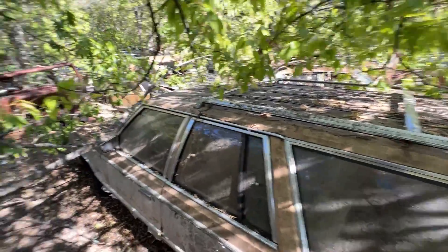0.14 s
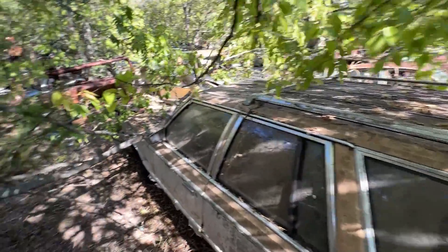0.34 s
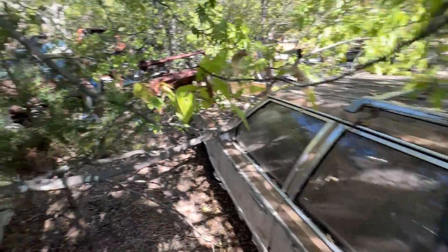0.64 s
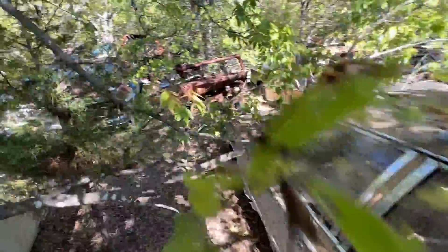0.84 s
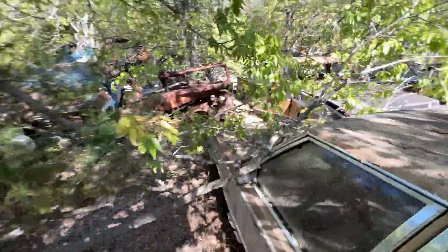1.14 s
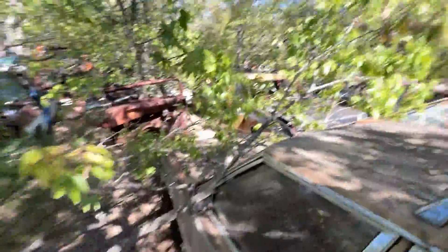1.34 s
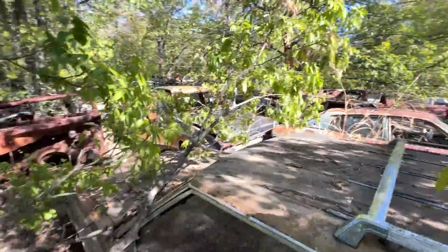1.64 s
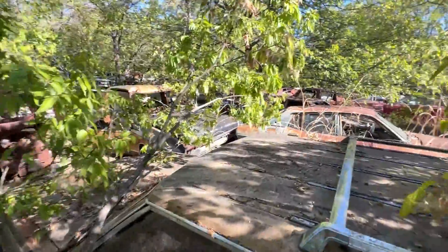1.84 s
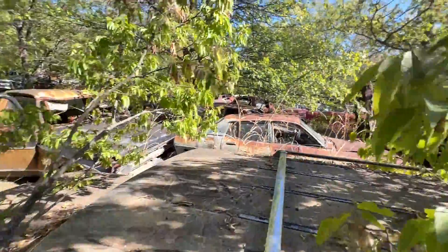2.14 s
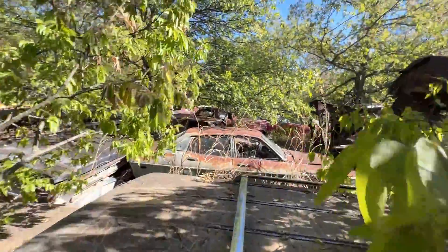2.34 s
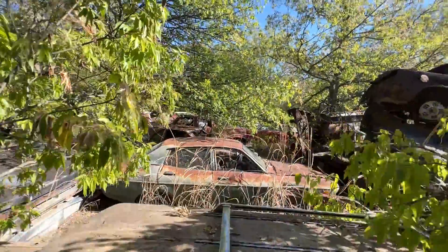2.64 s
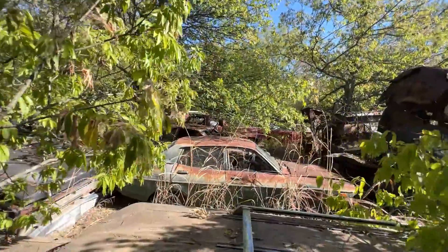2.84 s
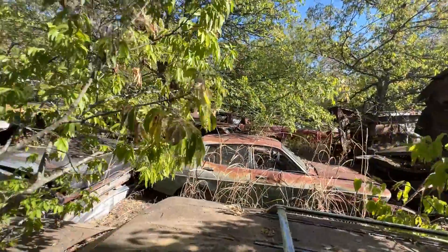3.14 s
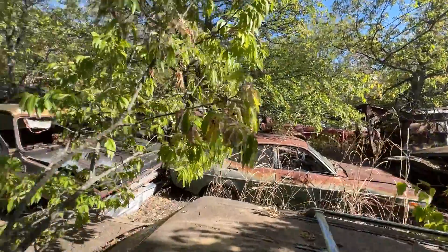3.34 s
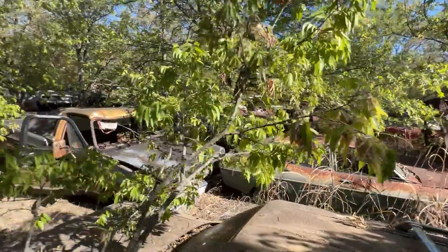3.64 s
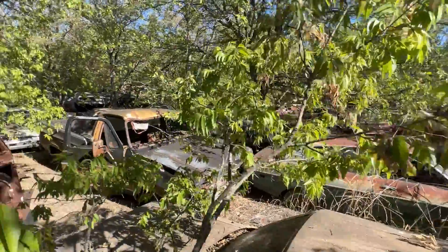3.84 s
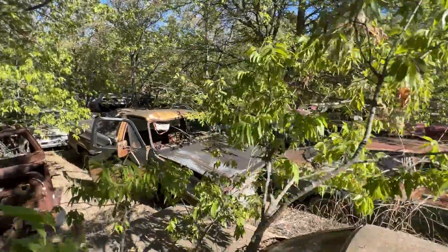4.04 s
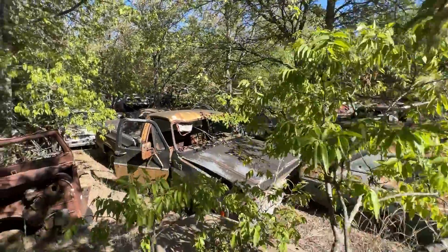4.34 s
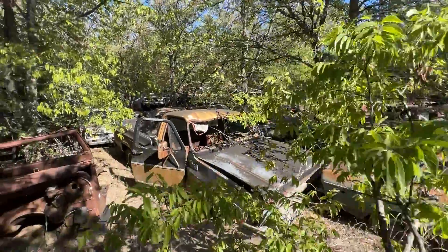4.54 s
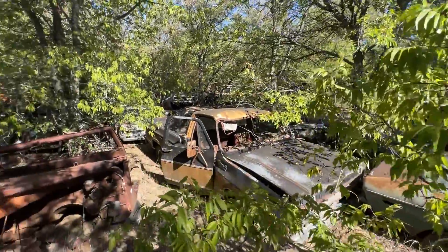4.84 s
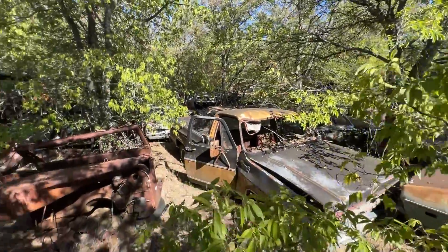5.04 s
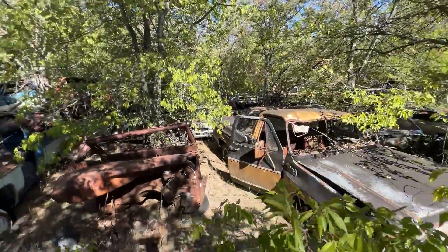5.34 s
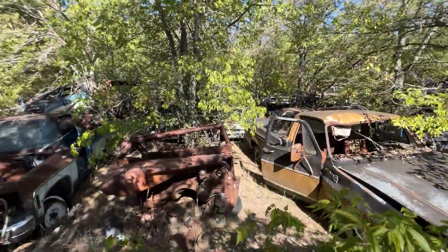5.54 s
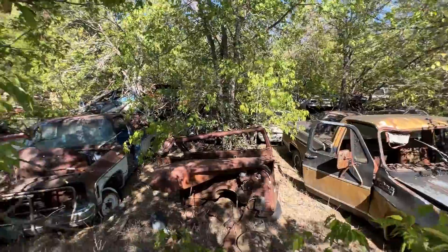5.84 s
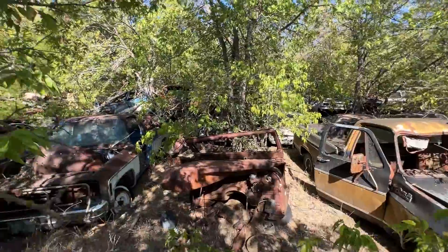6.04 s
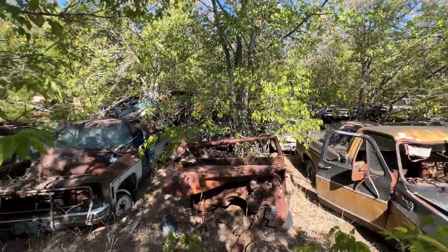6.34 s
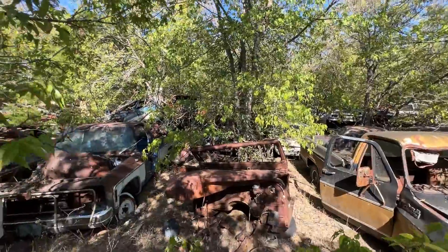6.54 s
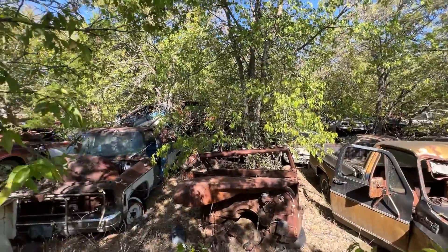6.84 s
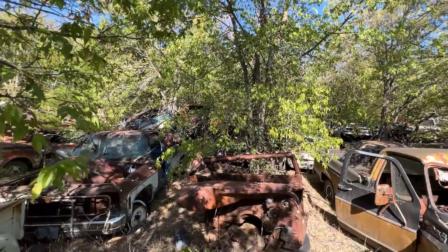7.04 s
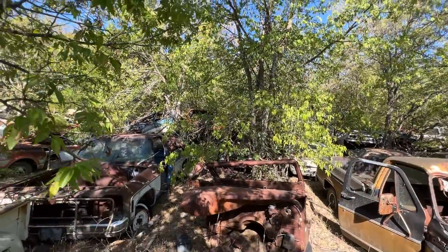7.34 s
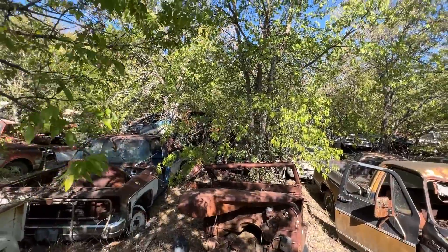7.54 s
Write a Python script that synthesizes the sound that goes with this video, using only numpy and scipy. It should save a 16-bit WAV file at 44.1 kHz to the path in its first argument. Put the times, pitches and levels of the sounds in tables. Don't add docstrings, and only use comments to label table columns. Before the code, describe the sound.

Close, crisp crunching of dry leaves and litter, brittle twig snaps and a few dull knocks as a person moves through a leafy yard.

```python
import sys
import numpy as np
from scipy import signal
from scipy.fft import rfft, irfft, next_fast_len
from scipy.io import wavfile
from scipy.ndimage import uniform_filter1d, minimum_filter1d, map_coordinates

SR = 44100
rng = np.random.default_rng(int(sys.argv[2]) if len(sys.argv) > 2 else 0)


def wav_out(sig):
    wavfile.write(sys.argv[1], SR, np.round(np.clip(np.atleast_2d(sig).T, -1, 1) * 32767).astype(np.int16))


def natural_amplitude(level_db):
    exponent = np.asarray(level_db, float) / 20
    return 10 ** exponent


N = 339127

# start_s, hold_s, leaf_db, litter_db, ground_db
STEPS = [(0.209, 0.11, -33.5, -50, -55), (0.33, 0.72, -38.5, -51.5, -51.5), (0.492, 0.035, -35, -50, -55),
         (1.219, 0.022, -60, -52, -42.5), (1.336, 0.016, -34, -38, -50.5), (1.456, 0.32, -39, -55, -84),
         (1.955, 0.02, -42.5, -53, -71), (2.194, 0.099, -40, -49, -58.5), (2.4, 0.26, -52.5, -59, -66.5),
         (2.914, 0.024, -46, -52, -62), (3.205, 0.015, -50, -54.5, -63), (3.416, 0.052, -44.5, -55.5, -67),
         (3.725, 0.31, -48, -62, -77), (4.031, 0.13, -41.5, -55, -56.5), (4.2, .1, -52, -55.5, -74),
         (4.68, 0.15, -73, -60.5, -78), (5.137, 0.028, -43, -58, -69), (5.384, 0.017, -40, -46, -57.5),
         (5.512, 0.18, -47, -53.5, -84), (5.863, 0.1, -55, -60.5, -64), (6.208, 0.093, -40, -53.5, -81),
         (6.32, 0.24, -37, -41.5, -53.5), (6.752, 0.032, -59, -60, -63),
         (7.089, 0.039, -48.5, -58.5, -64.5)]
PRESS_DB_PER_S, SETTLE_DB_PER_S = 162, 118
# time_s, leaf_db
STIR = [(0, -57), (.1, -51.5), (1.15, -47.5), (1.19, -45), (1.2, -64), (1.24, -64), (1.26, -50.5),
        (2.08, -57), (3.1, -49.5), (3.64, -55), (4.4, -53), (4.9, -55), (6.0, -54), (6.75, -68),
        (6.96, -57), (7.25, -52.5), (7.52, -60), (7.69, -58)]
STIR_LITTER_DB, STIR_GROUND_DB = -8.5, -15
# start_s, length_s, leaf_db, litter_db
CRUSHES = [(0.297, 0.03, -40, -41), (1.005, 0.015, -29, -37), (0.997, 0.042, -35, -38),
           (1.046, 0.016, -27.5, -31), (1.186, 0.01, -32.5, -36), (1.258, 0.062, -32, -46),
           (1.322, 0.029, -29.5, -39), (1.345, 0.041, -26.5, -43), (1.2, .018, -35, -50),
           (1.4, 0.019, -60, -35.5), (2.769, 0.13, -40.5, -59), (3.076, 0.051, -44, -52.5),
           (3.994, 0.087, -33, -48), (5.31, 0.097, -34, -43), (6.751, 0.062, -47, -54),
           (7.033, 0.053, -39, -87), (7.269, 0.075, -45, -64), (7.451, 0.037, -55.5, -69),
           (6.355, 0.056, -36.5, -43), (1.105, 0.035, -50, -43.5), (0.772, 0.023, -33, -51),
           (.908, 0.017, -34, -55), (6.243, 0.018, -35, -48), (7.278, .028, -50, -60),
           (4.3, .014, -42, -55)]
# freq_hz, level_db (per Hz)
LEAF_TONE = [(1000, -33.5), (1800, -24), (2500, -9), (5200, -3.5), (5700, 0), (7500, 0), (8900, 0.5),
             (10100, -9.5), (11900, -9.5), (14000, -11), (15600, -15)]
# freq_hz, level_db (per Hz)
LITTER_TONE = [(400, -23), (800, -7), (1100, -2.5), (1500, 1.5), (1900, -3), (2400, -12), (3500, -22)]
# freq_hz, level_db (per Hz)
GROUND_TONE = [(30, -45), (60, -18), (130, -9), (200, -2), (400, -3.5), (650, -6), (900, -3.5),
               (1500, -20.5)]

# start_s, hold_s, rumble_db
JOLTS = [(.1, .02, -60), (0.508, .02, -57.5), (0.947, 0.017, -48.5), (1.22, 0.18, -61), (1.643, 0.018, -66),
         (2.3, 0.46, -70), (3.076, 0.13, -61.5), (3.95, 0.079, -73), (4.45, 0.23, -77), (5.353, .04, -63),
         (6.75, .03, -74)]
JOLT_DB_PER_S, GRIP_DB = 101, -77
# freq_hz, level_db (per Hz)
HANDLING_TONE = [(20, -48), (40, -40), (55, 2.5), (85, -1), (120, -3.5), (200, -25.5)]

# start_s, peak_db, body_db (re peak), pitch_hz, t60_s
TWIGS = [(0.6718, -23, -11.5, 7140, 0.088), (.7724, -14.5, -25, 3330, 0.02),
         (0.7776, -8.5, -9.5, 1880, 0.016), (.9258, -17, -2, 1940, .016), (0.9374, -12, -10, 1920, 0.013),
         (.9763, -21, -9, 5840, 0.013), (1.01, -13, -13, 5200, 0.028), (1.0509, -16.5, -11, 1350, 0.012),
         (1.19, -23, 2, 1940, 0.018), (1.2318, -33, 3, 1038, 0.022), (1.2462, -13, -9, 5600, 0.035),
         (1.2605, -15.5, -7, 4240, 0.017), (1.309, -28, 1.5, 1700, .03), (1.344, -16, -9.5, 5800, 0.07),
         (2.893, -19.5, -20, 3940, 0.042), (2.9674, -25, -34, 3150, 0.077), (3.108, -29, -16, 1510, .023),
         (3.5907, -36, 0.5, 1250, 0.015), (4.1804, -24.5, 5, 1330, 0.0042),
         (4.6531, -36.5, 2.5, 1490, 0.01), (4.7221, -25.5, -42, 1490, 0.03),
         (5.1214, -4.5, -49, 8300, 0.016), (5.6267, -23, -67, 3940, 0.039),
         (6.4514, -22.5, -8, 6700, 0.028), (6.3777, -22.5, -8, 1480, 0.027), (6.3225, -24, -12, 6500, .01),
         (6.368, -22, -14, 4800, .012), (6.438, -22, -13, 6700, 0.016), (7.2058, -23, -16.5, 4050, 0.018)]
# start_s, peak_db, pitch_hz, t60_s
RIBS = [(0.3093, -25, 5800, 0.044), (.345, -19.5, 6000, 0.011), (.5318, -32, 6200, 0.024),
        (.751, -20.5, 5510, 0.0079), (1.5505, -29, 8450, 0.07), (1.6017, -19, 1510, 0.0081),
        (1.898, -26, 6160, 0.0084), (1.927, -25, 6250, 0.0075), (2.085, -37, 4690, 0.034),
        (2.261, -29, 7240, .022), (3.238, -22, 8400, 0.015), (3.825, -28, 4240, 0.028),
        (3.884, -22, 5700, 0.027), (4.012, -28, 7000, .024), (4.1386, -18, 6840, 0.012),
        (4.2224, -27.5, 5600, 0.026), (4.2935, -26, 8750, 0.018), (4.6017, -29, 7340, 0.02),
        (5.0617, -22.5, 6700, 0.012), (5.1005, -24, 7260, 0.0093), (5.3255, -25.5, 6800, .02),
        (5.3447, -26, 6130, 0.051), (6.1473, -31, 7150, 0.069), (6.2342, -25.5, 5470, 0.034),
        (6.2906, -24, 7000, .02), (6.295, -19.5, 5900, 0.023), (6.3131, -19, 6560, .022),
        (7.0974, -30, 8350, 0.021), (7.6092, -37.5, 4040, 0.011), (7.4164, -46, 7910, .02),
        (7.3, -29, 8100, .012), (7.241, -26, 7000, 0.0067), (7.2858, -32, 8200, .09),
        (7.5626, -41.5, 8200, 0.026), (7.5805, -44, 8100, 0.023), (5.18, -39, 3900, .14),
        (7.046, -36, 3700, .09)]
# start_s, peak_db
STEMS = [(0.6528, -24), (1.168, -30), (1.441, -28), (1.9905, -35), (2.789, -35), (3.1836, -31), (3.29, -38),
         (4.502, -32.5), (4.868, -36), (4.891, -31.5), (5.012, -31), (5.297, -32), (5.481, -27.5),
         (6.2117, -33), (6.931, -45), (7.0288, -31), (7.0348, -36), (7.15, -33), (7.3675, -40),
         (7.459, -41), (6.1308, -35), (6.153, -34), (4.325, -34), (3.978, -33), (7.1265, -29),
         (7.2325, -31), (7.2682, -32)]
RIB_BODY_DB, STEM_BODY_DB, STEM_HZ, STEM_T60_S = -44, -21, 6700, 0.02
TWIG_RING_DB, RIB_RING_DB, RIB_BROAD_DB = -11.0, -6.0, -4.5
OWN_RING_CYCLES, BODY_T60_S = 6.5, .006
CLICK_SIZE, CLICK_GROWTH = 2.5, .3
THICK_BELOW_HZ = 2600
# freq_hz, level_db (per Hz)
CRACK_TONE = [(150, -55), (400, -62), (1500, -16.5), (3000, -3), (5500, -1.5), (8900, 4.5), (10100, -10),
              (15600, -17)]

# start_s, peak_db, pitch_hz, t60_s, left_gain (negative: the ports move in opposition)
KNOCKS = [(.779, -29.5, 740, 0.03, 1.2), (0.780, -38.5, 190, 0.077, 0.5), (0.780, -42, 376, 0.13, 1.5),
          (.926, -29, 783, .05, -0.1), (0.939, -25, 640, 0.043, -0.1), (.965, -35.5, 322, 0.035, .5),
          (.972, -42, 113, 0.076, 1), (1.008, -40, 604, 0.045, 2), (1.194, -19, 228, 0.022, -0.25),
          (1.19, -27, 754, 0.052, -.5), (1.232, -20, 198, 0.13, -0.64), (1.235, -21.5, 596, 0.064, 0.06),
          (1.252, -21, 620, 0.065, -0.3), (1.256, -25, 342, 0.033, -1.3), (1.325, -34, 836, 0.073, 0.5),
          (2.906, -40.5, 420, 0.15, 1), (2.985, -47, 195, .1, 1.2), (2.629, -58.5, 159, 0.55, 1.4),
          (3.06, -50, 165, 0.19, 1.4), (3.24, -65, 91.5, 0.19, 2), (4.049, -41.5, 464, 0.084, 2.5),
          (4.049, -44, 332, 0.12, 1.5), (5.33, -56.5, 79.4, 0.38, 1.0), (6.445, -40, 870, 0.081, 1.5),
          (4.65, -51, 262, 0.066, 1.2), (5.9, -50.5, 700, .06, 1), (1.645, -53, 160, .08, 1)]
# start_s, peak_db
PANEL_HITS = [
    (2.894, -35.5),
    (2.967, -47.5),
]
# pitch_hz, level_db, t60_s
PANEL_MODES = [(88, -2, 0.22), (165, -0.5, 0.28), (190, -9, .12), (412, -9.5, 0.26), (800, 2.5, 0.074),
               (1440, 6.5, 0.046), (1920, 5, 0.046), (2750, 4, 0.036)]

# freq_hz, left_minus_right_db
LEFT_MINUS_RIGHT = [(60, -0.5), (380, 2.5), (700, 3.5), (1300, -6), (2400, -4.5), (4400, -10.5),
                    (8100, -6.5), (10500, 5), (15000, -3.5)]
# freq_hz, likeness (-1 to 1)
LIKENESS = [(40, -.35), (90, -.25), (200, 0.66), (600, 0.049), (1500, 0.27), (3000, -0.0072), (9500, 0.015),
            (10900, 0.67), (15000, 0.9)]
IN_PHASE_HZ, HALF_TURN_HZ = 11750, 2600
# time_s, left_minus_right_db (beyond the mean)
SWING = [(0, 2), (.26, -1.5), (.4, 0.2), (.92, -1), (1.03, -0.5), (1.86, -.5), (2.9, .1), (3.32, 1.5),
         (4.07, 0), (5.1, -0.5), (5.2, -0.6), (6.3, -2), (6.42, 0.6), (7.45, 1), (7.69, 4)]
# time_s, treble_db
AIM = [(0, 1.5), (.5, 4), (1.19, 2), (1.197, -16), (1.24, -14), (1.246, 3), (2.7, 1), (2.91, -3.5),
       (3.3, 0), (3.4, 1), (5.1, -2), (5.3, -4.5), (6.45, -5.5), (6.72, -3.5), (7.69, -2.5)]
# freq_hz, width_hz, gain_db
NOTCHES = [(4950, 82, 5), (5420, 70, -7), (5541, 37, 5.5), (7530, 200, -16.5), (9720, 60, -16),
           (10370, 220, -10)]
MASKED_FROM_HZ, TOP_HZ = 9600, 15750
MID_GAP_HZ, SIDE_GAP_HZ = (13750, 15120), (11050, 12400)


def at_hz(points, hz):
    table = np.array(points)
    return np.interp(np.log(hz + 1), np.log(table[:, 0]), table[:, 1])


def rms_one(x):
    return x / np.sqrt(np.mean(x ** 2) + 1e-20)


def filtered(x, gain_at):
    size = next_fast_len(N + 4096)
    hz = np.arange(size // 2 + 1) * SR / size
    return irfft(rfft(x, size) * gain_at(hz), size)[..., :N]


def coloured(x, tone):
    return rms_one(filtered(x, lambda hz: natural_amplitude(at_hz(tone, hz))))


def ring(clicks, hz, t60):
    radius = natural_amplitude(-60 / (max(t60, .002) * SR))
    angle = 2 * np.pi * hz / SR
    feedback = [1, -2 * radius * np.cos(angle), radius * radius]
    return signal.lfilter([0, np.sin(angle)], feedback, clicks + 1e-18)


def swells(s, hold, level_db, rise_db_per_s, fall_db_per_s, bed_db):
    t = np.arange(0, N + 64, 64)[:, None] / SR
    early, late = np.maximum(s - t, 0), np.maximum(t - s - hold, 0)
    shape_db = level_db - rise_db_per_s * early - fall_db_per_s * late
    power = np.sum(natural_amplitude(2 * shape_db), axis=1)
    return np.sqrt(np.interp(np.arange(N) / SR, t[:, 0], power) + natural_amplitude(2 * bed_db))


def crackle(per_s, spread_db, t60, hush_db):
    sizes = natural_amplitude(spread_db * np.minimum(rng.exponential(1, N), 2.6))
    born = rng.random(N) < per_s / SR
    power = signal.lfilter([1], [1, -natural_amplitude(-120 / (t60 * SR))], born * sizes ** 2)
    return np.sqrt(power / power.mean() + natural_amplitude(2 * hush_db)) * rng.standard_normal((2, N))


def ticks(per_s, spread_db, cycles):
    sizes = natural_amplitude(spread_db * np.minimum(rng.exponential(1, (2, N)), 4))
    pops = sizes * (rng.random((2, N)) < per_s / SR)
    dealt = rng.integers(0, 16, (2, N))
    pitches = np.geomspace(1000, 9500, 16) * natural_amplitude(rng.normal(0, 0.654, 16))
    out = np.zeros((2, N))
    for k, hz in enumerate(pitches):
        out += ring(pops * (dealt == k), hz, cycles / hz) * np.sqrt(hz)
    return rms_one(out)


def patchy(x, patchy_db, per_s):
    hz, s, z = signal.stft(x, SR, nperseg=256)
    field = rng.standard_normal((40, 400))
    rows, columns = np.meshgrid(4 * np.log2(hz / 100 + 1), s * per_s, indexing="ij")
    patches = map_coordinates(field, [rows, columns], order=1)
    gain = natural_amplitude(patchy_db * np.where(rows < 26.5, 1, .4) * patches)
    return signal.istft(z * gain, SR, nperseg=256)[1][:, :N]


def tread():
    s, hold, *levels = np.transpose(STEPS)
    stir_db = np.interp(np.arange(N) / SR, *np.transpose(STIR))
    leaf, litter, ground = [
        swells(s, hold, level_db, PRESS_DB_PER_S, SETTLE_DB_PER_S, stir_db + under_db)
        for level_db, under_db in zip(levels, (0, STIR_LITTER_DB, STIR_GROUND_DB))]
    for start, length, leaf_db, litter_db in CRUSHES:
        span = slice(round(start * SR), round((start + length) * SR))
        swell = np.sin(np.pi * np.linspace(0, 1, span.stop - span.start)) ** 0.49
        leaf[span] = np.hypot(leaf[span], natural_amplitude(leaf_db) * swell)
        litter[span] = np.hypot(litter[span], natural_amplitude(litter_db) * swell)
    fine = crackle(per_s=350.0, spread_db=4.5, t60=.008, hush_db=-5.0)
    coarse = crackle(per_s=90.0, spread_db=0.5, t60=0.11, hush_db=-0.5)
    lumps = crackle(per_s=8.1, spread_db=-1.0, t60=0.056, hush_db=4.5)
    cells = ticks(per_s=500.0, spread_db=3.5, cycles=154.0)
    leaf_mix = patchy(fine + 1.26 * coarse + 0.57 * cells, patchy_db=3.0, per_s=24.0)
    litter_mix = patchy(coarse + 0.48 * fine + 0.21 * cells, patchy_db=4.5, per_s=26.0)
    leaves = leaf * coloured(leaf_mix, LEAF_TONE)
    soil = ground * coloured(lumps + 0.36 * coarse, GROUND_TONE)
    return leaves + litter * coloured(litter_mix, LITTER_TONE) + soil


def handling():
    effort = swells(*np.transpose(JOLTS), JOLT_DB_PER_S, JOLT_DB_PER_S, GRIP_DB)
    return effort * coloured(rng.standard_normal((2, N)), HANDLING_TONE)


def energy(x):
    return np.sum(x ** 2, axis=-1, keepdims=True)


def fracture(peak_db, t60):
    t = np.arange(4096) / SR
    shape = natural_amplitude(-60 * t / t60) + natural_amplitude(-18.0 - 60 * t / (5.0 * t60))
    shape = shape * np.minimum(t / 0.0011, 1)
    burst = rng.standard_normal((2, len(t))) * shape
    burst[:, 60] += CLICK_SIZE * natural_amplitude(CLICK_GROWTH * (peak_db + 15.5)) * rng.choice([-1, 1], 2)
    return burst * natural_amplitude(peak_db) * np.sqrt(energy(shape) / energy(burst))


def snaps():
    bursts, rings = np.zeros((2, N + 4096)), np.zeros((2, N + 4096))
    twigs = [(*row, TWIG_RING_DB, 0) for row in TWIGS]
    ribs = [(s, peak_db, RIB_BODY_DB, hz, t60, RIB_RING_DB, RIB_BROAD_DB)
            for s, peak_db, hz, t60 in RIBS]
    stems = [(s, peak_db, STEM_BODY_DB, STEM_HZ, STEM_T60_S, TWIG_RING_DB, 0) for s, peak_db in STEMS]
    for s, peak_db, body_db, hz, t60, ring_db, broad_db in twigs + ribs + stems:
        burst = fracture(peak_db, max(t60, .003))
        own = ring(signal.lfilter([1, 0, -1], 1, burst), hz, OWN_RING_CYCLES / hz)
        own *= np.sqrt(energy(burst) / energy(own)) * natural_amplitude(ring_db)
        body_hz = (hz if hz < THICK_BELOW_HZ else 1450) * natural_amplitude(rng.normal(0, 0.44))
        body = ring(burst, body_hz, BODY_T60_S) * natural_amplitude(body_db - 12.5)
        at = round(s * SR)
        bursts[:, at:at + 4096] += burst * natural_amplitude(broad_db)
        rings[:, at:at + 4096] += own + body
    rings = signal.sosfilt(signal.butter(2, 650, "high", fs=SR, output="sos"), rings)
    cracks = filtered(bursts[:, :N], lambda hz: natural_amplitude(at_hz(CRACK_TONE, hz) - 4.5))
    return cracks + rings[:, :N]


def knocks():
    out, t = np.zeros((2, N)), np.arange(16384) / SR
    for s, peak_db, hz, t60, left in KNOCKS:
        note = ring(rng.standard_normal(len(t)) * natural_amplitude(-60 * t / 0.022), hz, t60)
        at = round(s * SR)
        out[:, at:at + len(t)] += natural_amplitude(peak_db) * note / np.abs(note).max() * [[left], [1]]
    for hz, level_db, t60 in PANEL_MODES:
        for s, peak_db in PANEL_HITS:
            wobble = 0.62 * np.interp(t, t[::512], rng.standard_normal(32))
            note = np.sin(2 * np.pi * hz * t + wobble) * natural_amplitude(-60 * t / t60)
            note *= np.minimum(t * hz / 6.9, 1)
            at = round(s * SR)
            out[:, at:at + len(t)] += natural_amplitude(peak_db + level_db + rng.normal(0, 4.0, (2, 1))) * note
    return signal.sosfilt(signal.butter(2, 60, "high", fs=SR, output="sos"), out)


def microphone_pair(sound):
    left, right = sound
    t = np.arange(N) / SR
    alike = lambda hz: np.clip(at_hz(LIKENESS, hz), -.99, .99)
    turn = lambda hz: np.exp(1j * np.pi * (hz - IN_PHASE_HZ) / HALF_TURN_HZ * (hz > 9000))
    own = filtered(left, lambda hz: np.sqrt(1 - alike(hz) ** 2))
    left = own + filtered(right, lambda hz: alike(hz) * turn(hz))
    side = np.array([[.5], [-.5]])
    balance = lambda hz: natural_amplitude(side * at_hz(LEFT_MINUS_RIGHT, hz))
    pair = natural_amplitude(1.0) * filtered(np.array([left, right]), balance)
    pair = pair * natural_amplitude(side * np.interp(t, *np.transpose(SWING)))
    treble = filtered(pair, lambda hz: hz > 10200)
    return pair + treble * (natural_amplitude(np.interp(t, *np.transpose(AIM))) - 1)


def scene():
    return microphone_pair(tread() + handling() + snaps()) + knocks()


def masked_treble(sums, line_db, band_db):
    window = np.sin(np.pi * (np.arange(2048) + .5) / 2048)
    padded = np.pad(sums, ((0, 0), (492, 0)))
    hz, s, z = signal.stft(padded, SR, window, nperseg=2048, noverlap=1024)
    power = np.abs(z) ** 2
    masker = power[:, (hz > 5000) & (hz < 9000)].mean(axis=(0, 1))
    weak = uniform_filter1d(power, size=3, axis=1) < masker * natural_amplitude(2 * line_db)
    weak |= uniform_filter1d(power, size=20, axis=1) < masker * natural_amplitude(2 * band_db)
    low, high = np.transpose([MID_GAP_HZ, SIDE_GAP_HZ])[:, :, None]
    gap = ((hz > low) & (hz < high)) | (hz > TOP_HZ)
    weak = (weak & (hz > MASKED_FROM_HZ)[:, None]) | gap[:, :, None]
    return signal.istft(z * weak, SR, window, nperseg=2048, noverlap=1024)[1][:, 492:492 + N]


def top_cut(x):
    return signal.sosfilt(signal.butter(12, 16970, fs=SR, output="sos"), x)


def record(dry):
    dips = lambda hz: natural_amplitude(sum(dip_db * np.exp(-((hz - dip_hz) / width) ** 2)
                              for dip_hz, width, dip_db in NOTCHES))
    left, right = filtered(dry, lambda hz: dips(hz) * np.where(hz < TOP_HZ, 1, .008 * (hz < 16900)))
    sums = np.array([left + right, left - right]) / 2
    power = np.diff(right, prepend=0) ** 2
    usual = uniform_filter1d(power, size=1024, origin=500)
    sudden = uniform_filter1d(power, size=128) > 4.5 * usual
    widened = -minimum_filter1d(-1.0 * sudden, size=900)
    near_attack = np.minimum(uniform_filter1d(widened, size=200), 1)
    mid, side = sums - masked_treble(sums, line_db=-15.5, band_db=-17.0) * (1 - near_attack)
    return top_cut(np.array([mid + side, mid - side]))


dry = scene()
out = record(dry)
wav_out(out)
```